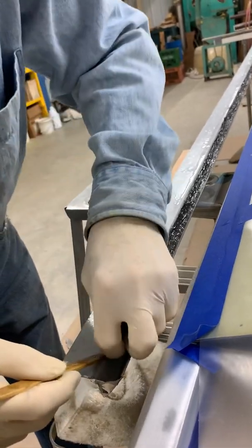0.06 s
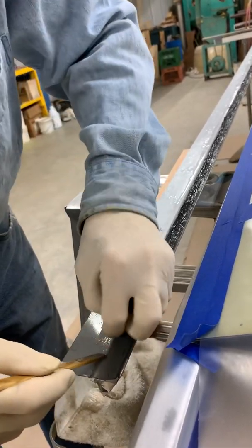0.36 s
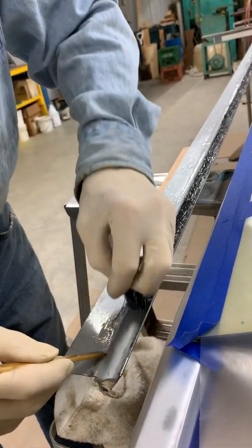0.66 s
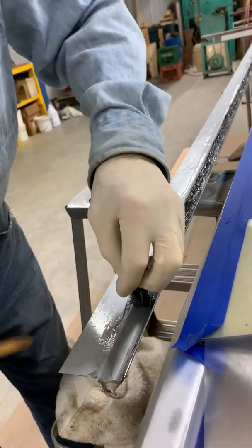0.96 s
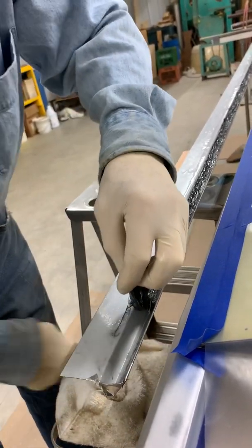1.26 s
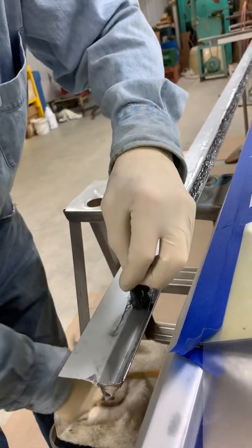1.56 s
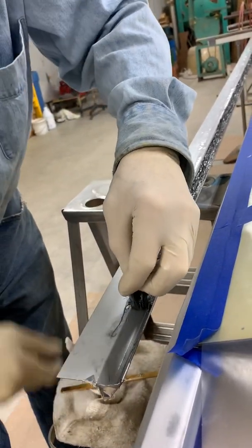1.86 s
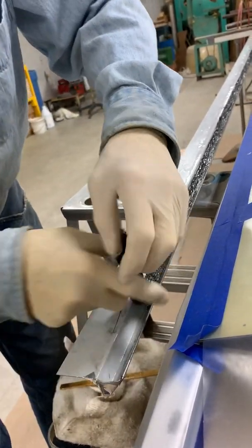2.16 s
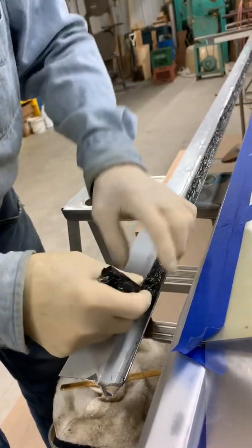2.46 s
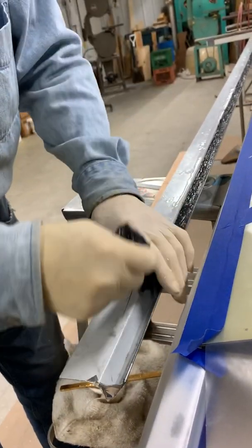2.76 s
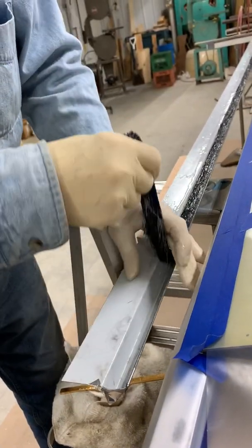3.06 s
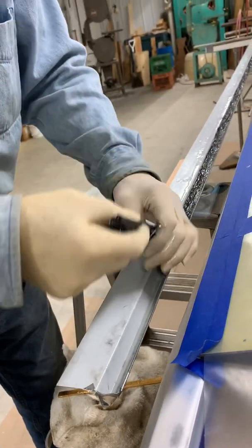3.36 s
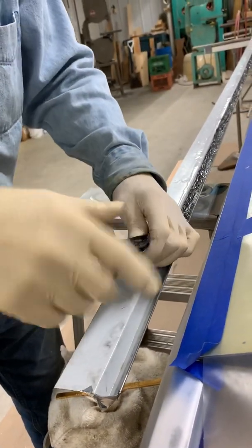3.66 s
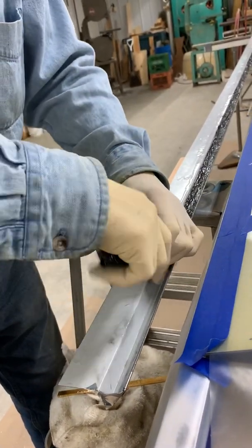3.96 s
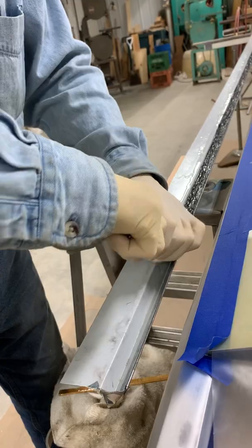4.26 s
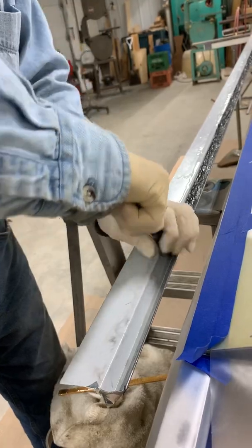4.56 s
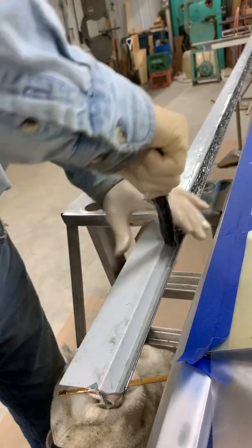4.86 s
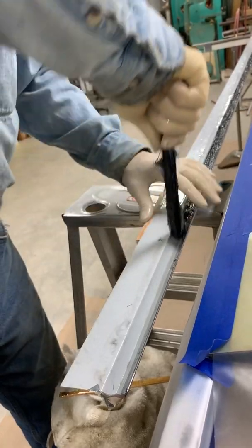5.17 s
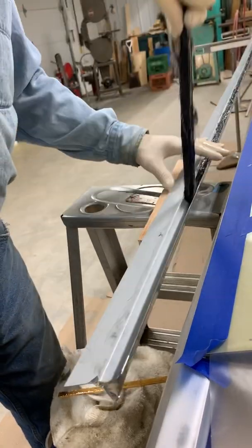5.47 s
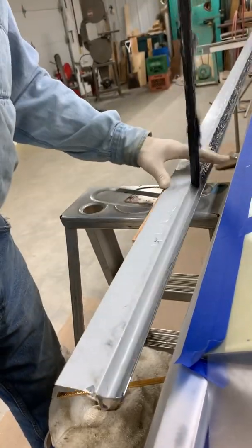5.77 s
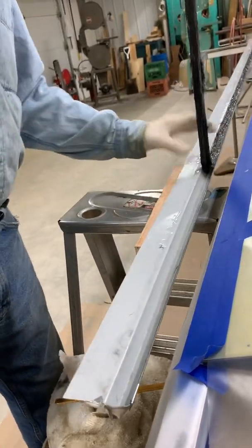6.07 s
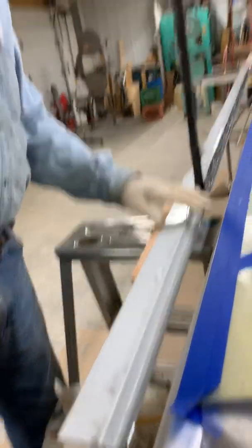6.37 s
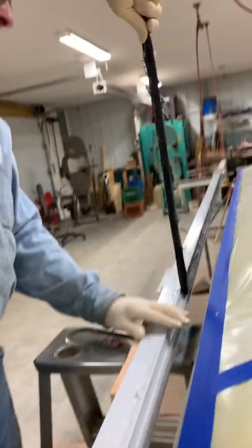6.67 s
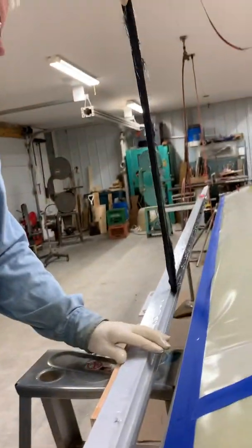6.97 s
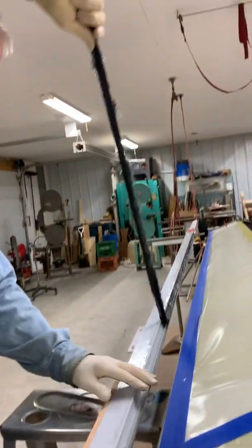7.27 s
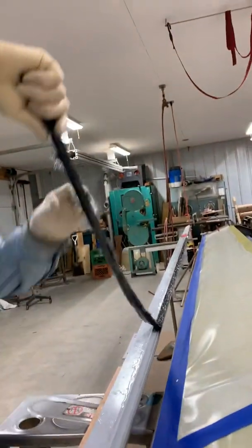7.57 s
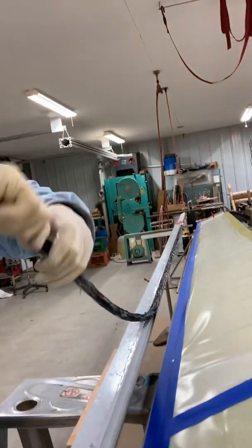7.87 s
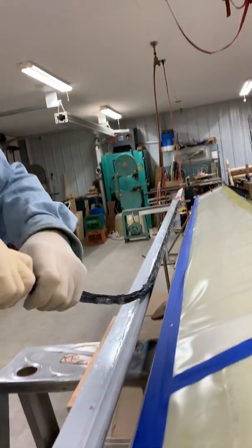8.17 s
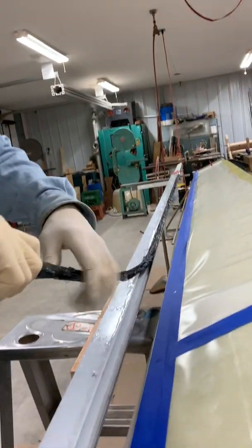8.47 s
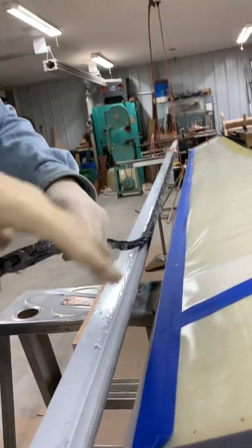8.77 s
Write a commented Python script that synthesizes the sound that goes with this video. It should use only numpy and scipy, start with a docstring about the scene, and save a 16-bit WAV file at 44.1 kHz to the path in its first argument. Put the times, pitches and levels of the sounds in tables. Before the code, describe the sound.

Sticky resin-soaked fibre crackles and snaps as gloved hands peel it from an aluminium trough, which knocks and rings in a workshop.

```python
"""Peeling carbon fibre from a trough

A workshop, close up, on a hand-held stereo microphone. Gloved hands peel a resin-soaked bundle of carbon
fibre out of a long aluminium trough, a little to the right. Tacky resin threads crackle and snap, sleeves
and gloves rustle, and the trough, lifted by the sticking fibre, drops back on its stand, knocks and rings.
The shop rumbles low underneath."""
import sys
import numpy as np
from scipy import signal
from scipy.fft import rfft, irfft, next_fast_len
from scipy.io import wavfile
from scipy.ndimage import map_coordinates

SR = 44100
rng = np.random.default_rng(int(sys.argv[2]) if len(sys.argv) > 2 else 0)


def store_wav(level_fs):
    """Save 16-bit WAV to argv[1]."""
    pcm = np.round(np.clip(np.atleast_2d(level_fs), -1, 1) * 32767)
    wavfile.write(sys.argv[1], SR, pcm.T.astype(np.int16))


N = 392931

# the trough landing on its stand: start_s, low_db, middle_db, high_db, click_db, clatter_t60_s
KNOCK_HITS = [(4.54, -65, -56, -75, -50, 0.018), (5.6811, -27, -20.5, -33.5, -29, 0.074),
              (5.7885, -37.5, -42.5, -40.5, -57, 0.041), (6.0212, -39, -46, -34.5, -36.5, 0.041),
              (6.185, -41, -37.5, -52, -55, 0.071), (6.3885, -45.5, -53.5, -50, -64, 0.045),
              (7.3308, -49.5, -47.5, -43.5, -59, 0.092), (7.357, -49.5, -53.5, -55, -75, 0.1)]
# modes of the aluminium trough: pitch_hz, level_db, t60_s
TROUGH_MODES = [(313, 1, .32), (378, -7, .28), (500, -9, .35), (641, 3.5, .66), (653, -4, .3),
                (705, -7, .4), (790, -5, .25), (753, -3, .28), (963, -4, .38), (1086, -8, .25),
                (1154, -5, .25), (1310, -7, .42), (1385, -8, .4), (1480, -5, .3), (1673, -3, .2),
                (1721, -2, .25), (1795, -2, .25), (1830, -5, .3), (1906, 0, .25), (1924, -1, .3),
                (2011, -3, .22), (2057, -3, .22), (2105, -4, .38), (2190, -1, .32), (2240, -3, .22),
                (2362, -4, .22), (2492, -3, .22), (2760, -3, .22), (2900, 2, .2), (2930, 1, .2),
                (3004, -3, .22), (3950, -7, .2)]


def from_db(db):
    """Decibels to gain."""
    return 10 ** (np.asarray(db) / 20)


def rms_one(x):
    """Scale to unit rms."""
    return x / np.sqrt(np.mean(x ** 2) + 1e-20)


def in_time(rows):
    """Read rows of time_s, value at every sample."""
    return np.interp(np.arange(N) / SR, *np.transpose(rows))


def at_hz(points, hz):
    """Read rows of frequency_hz, value on a log-frequency axis."""
    points_hz, values = np.transpose(points)
    return np.interp(np.log(np.maximum(hz, 1)), np.log(points_hz), values)


def drift(per_s):
    """Random wandering with unit rms."""
    knots = rng.standard_normal(4096)
    return rms_one(np.interp(np.arange(N) / SR * per_s, np.arange(len(knots)), knots))


def dying(t60, size):
    """An envelope that falls 60 dB in t60 seconds."""
    return from_db(-60 * np.arange(size) / SR / t60)


def band(x, low_hz, high_hz):
    """Causal band-pass."""
    return signal.sosfilt(signal.butter(2, [low_hz, high_hz], "band", fs=SR, output="sos"), x)


def colour(x, spectrum, size=4096):
    """Minimum-phase filter with the shape of the given spectrum; white noise keeps its power."""
    gain = from_db(at_hz(spectrum, np.arange(size // 2 + 1) * SR / size))
    cepstrum = irfft(np.log(gain))
    cepstrum[1:size // 2] *= 2
    cepstrum[size // 2 + 1:] = 0
    response = irfft(np.exp(rfft(cepstrum)))
    return signal.oaconvolve(x, response / np.linalg.norm(response))[:len(x)]


def resonate(x, hz, width_hz):
    """A two-pole resonance with unit gain at its peak."""
    r = np.exp(-np.pi * width_hz / SR)
    feedback = [1, -2 * r * np.cos(2 * np.pi * hz / SR), r * r]
    return signal.lfilter((1 - r * r) / 2 * np.array([1, 0, -1]), feedback, x)


def add(track, start_s, sound):
    """Mix a sound into a track."""
    start = int(start_s * SR)
    track[start:start + len(sound)] += sound[:N - start]


def gestures(rows, attack_s, release_s, idle_db):
    """Gain of overlapping movements: each swells, holds and dies away; their powers add."""
    t, power = np.arange(N) / SR, from_db(idle_db) ** 2
    for start_s, length_s, level_db in rows:
        swell = np.clip((t - start_s) / attack_s, 0, 1)
        fade = np.exp(-np.clip((t - start_s - length_s) / release_s, 0, 20))
        power = power + (from_db(level_db) * swell * fade) ** 2
    return np.sqrt(power)


def friction(rows, width_ratio, grain_db=3.5):
    """Each short slide swells and fades in a noise band of its own, in uneven slips."""
    out = np.zeros(N)
    for start_s, length_s, level_db, hz in rows:
        size = int(length_s * SR)
        slide = rms_one(band(rng.standard_normal(size), hz / width_ratio, hz * width_ratio))
        add(out, start_s, from_db(level_db) * slide * np.sin(np.linspace(0, np.pi, size)))
    return out * rms_one(from_db(grain_db * drift(110)))


def shop_air(rumble_db=-1.0, swell_db=1.5, hiss_db=-82.5):
    """Room tone: a low rumble, swelling at random, under a faint steady hiss, wide in the treble."""
    # slow course of the rumble: time_s, level_db
    rumble_levels = [(0.0, -55), (1.8, -61.5), (3.3, -56.5), (4.4, -56.5), (5.7, -52.5), (6.6, -55.5),
                     (7.7, -54.5), (8.9, -53)]
    # spectra of the rumble and the hiss: frequency_hz, level_db
    rumble_spectrum = [(12, -17.5), (25, -7.5), (45, 8.5), (80, -1), (150, -15), (300, -35.5), (600, -49.5),
                       (2000, -65)]
    hiss_spectrum = [(300, -7), (600, -9), (800, 6.5), (1050, -4.5), (1900, 0.5), (4000, -11.5),
                     (8000, -10.5), (15000, -9.5)]
    swell = from_db(in_time(rumble_levels) + rumble_db + swell_db * drift(9))
    rumble = swell * colour(rng.standard_normal(N), rumble_spectrum)
    side = band(colour(rng.standard_normal(N), hiss_spectrum), 1500, 19000) * np.array([[1], [-1]])
    mid = colour(rng.standard_normal(N), hiss_spectrum)
    return rumble + from_db(hiss_db) * (mid + 0.88 * side)


def workshop_echo(x, build_s=0.0012):
    """Diffuse echoes build up and die, the treble first; both microphone ports hear the bass alike."""
    # reverberation of the workshop: frequency_hz, t60_s
    decay_times = [(200, 0.89), (530, 1), (1400, 0.9), (3700, 0.21), (9700, 0.45), (16000, 0.27)]
    mid, side = rng.standard_normal((2, SR))
    noise = mid + .65 * band(side, 500, 19000) * np.array([[1], [-1]])
    edges_hz, response = np.geomspace(80, 19000, num=10), 0
    for k, (low, high) in enumerate(zip(edges_hz, edges_hz[1:])):
        t60 = at_hz(decay_times, np.sqrt(low * high))
        response = response + (-1) ** k * band(noise, low, high) * dying(t60, SR)
    response *= 1 - np.exp(-np.arange(SR) / SR / build_s)
    return signal.oaconvolve(x[None], response / np.linalg.norm(response[0]), axes=1)[:, :N]


def handling_flutter(gain_db=-4.5, swing_db=2.2):
    """Moving cloth and the hand-held microphone make a low, unsteady flutter."""
    # course of the handling noise: time_s, level_db
    flutter_levels = [(0.0, -56), (0.5, -70.5), (1.45, -64), (2.3, -68), (3.4, -57.5), (4.25, -65),
                      (4.6, -61.5), (5.9, -52.5), (7.14, -61.5), (7.8, -57), (8.2, -60), (8.9, -58)]
    # its spectrum: frequency_hz, level_db
    flutter_spectrum = [(40, -4.5), (80, 2), (150, 1.5), (250, -4.5), (400, -16), (700, -26.5), (2000, -45)]
    flutter = colour(rng.standard_normal(N), flutter_spectrum)
    return flutter * from_db(in_time(flutter_levels) + gain_db + swing_db * drift(11))


def scrapes():
    """A stick and the gloves scrape on the trough and along the bundle, each time in a narrow band."""
    # scraping movements: start_s, length_s, level_db, centre_hz
    slides = [(0.42, 0.18, -72.5, 2700), (0.56, 0.29, -73, 2900), (1.16, 0.08, -72, 1450),
              (1.79, 0.13, -78, 1650), (3.5, 0.45, -79, 1900), (7.26, 0.06, -76, 2900),
              (7.7, 0.62, -77, 1850), (8.28, 0.24, -75, 2800), (8.6, 0.12, -74, 1400)]
    return friction(slides, width_ratio=1.17)


def sleeve_flaps(gain_db=-5.0):
    """Folds of the denim sleeves flap dully."""
    # moving folds: start_s, length_s, level_db, centre_hz
    folds = [(0.08, 0.1, -63, 473), (0.99, 0.069, -72, 447), (1.32, 0.14, -67, 420), (1.5, 0.097, -88, 400),
             (2.06, 0.1, -68, 596), (3.36, 0.19, -77, 470), (3.62, 0.27, -83, 420),
             (4.53, 0.059, -57.5, 296), (4.75, 0.14, -66, 480), (4.97, 0.13, -66, 650),
             (7.62, 0.19, -64.5, 390), (7.8, 0.25, -71, 480), (8.18, 0.13, -70.5, 402),
             (8.34, 0.12, -77, 450), (8.78, 0.25, -77.5, 422)]
    return from_db(gain_db) * friction(folds, width_ratio=1.46)


def rustle(rub_db=-1.5, hollow_db=-3.5, grain_db=2.5, slip_db=3.0):
    """Denim and glove rubber rub and swish in uneven little slips, sounding hollow inside the trough."""
    # strokes of sleeves and gloves: start_s, length_s, rub_level_db, swish_offset_db, hollow_offset_db
    strokes = [(-0.04, 0.27, -70.5, 8, 9), (0.262, 0.15, -84.5, 14, 11), (0.44, 0.09, -74, 0, 7.5),
               (0.56, .22, -97, 10, -4), (0.9, 0.029, -83.5, 17, -2), (1.148, 0.023, -73.5, 15, 17.5),
               (1.27, 0.21, -63, -5.5, -4), (1.45, 0.19, -71.5, -11, -6), (1.78, 0.07, -73.5, -18, -18),
               (2.049, 0.033, -64.5, 4.5, -14), (2.68, 0.22, -72.5, -11, 3), (2.84, 0.568, -73, 1, 9),
               (3.19, 0.098, -68, 1, 8), (3.358, 0.45, -79.5, 7.5, 11.5), (4.17, 0.17, -78.5, 0, -17),
               (4.552, 0.15, -67.5, -20, 1.5), (4.758, 0.066, -62.5, -27, -2.5),
               (5.218, 0.84, -63, -9, 0.5), (5.529, 0.3, -53.5, -16.5, -9), (6.178, 0.027, -60.5, 8.5, 17),
               (6.63, 0.36, -65.5, 5, 5.5), (7.41, 0.13, -58.5, -5, -7), (7.54, 0.24, -64.5, -2.5, 0.5),
               (7.76, 0.38, -80, 2.5, 2.5), (8.26, 0.063, -76.5, 11.5, 2), (8.59, 0.087, -75.5, 14.5, 7)]
    # spectra of rubbing cloth and of a sliding sleeve: frequency_hz, level_db
    rub_spectrum = [(150, -8), (400, -3), (600, -10), (1200, -7.5), (2000, -7), (3500, -9), (5000, -14),
                    (15000, -32.5)]
    swish_spectrum = [(2500, -25), (4000, -20.5), (4900, 10.5), (6500, 10.5), (7600, -5.5), (9000, -3),
                      (11000, -3.5), (15000, -6)]
    # resonances around a glove in the trough: centre_hz, width_hz, level_db
    cavity_modes = [(805, 70, -3), (1710, 110, 0.5), (2020, 140, 5), (2940, 220, 2.5), (3790, 180, -1.5),
                    (4140, 420, 1.5)]
    start_s, length_s, level_db, swish_offset_db, hollow_offset_db = np.transpose(strokes)

    def stroke_gain(offset_db, idle_db):
        rows = zip(start_s, length_s, level_db + offset_db)
        return gestures(rows, attack_s=0.067, release_s=0.031, idle_db=idle_db)

    slips = rms_one(rng.standard_normal(N) * from_db(grain_db * drift(300) + slip_db * drift(35)))
    rub = from_db(rub_db) * colour(slips, rub_spectrum) * stroke_gain(0, idle_db=-82)
    swish = colour(slips, swish_spectrum) * stroke_gain(swish_offset_db, idle_db=-84)
    cavity = rms_one(sum(from_db(db) * resonate(slips, hz, width) for hz, width, db in cavity_modes))
    read_position = np.cumsum(1 + .04 * drift(12))   # the cavity changes as the hand moves
    hollow = from_db(hollow_db) * map_coordinates(cavity, [read_position], order=1, mode="mirror")
    return rub + swish + hollow * stroke_gain(hollow_offset_db, idle_db=-82)


def trough_taps(width_ratio=1.37, ring_db=-11, ring_t60_s=.09, size=8192):
    """A touch on the hand-damped trough wakes a narrow group of modes; the nearest one rings briefly."""
    # light taps of stick and fingers: start_s, level_db, centre_hz, t60_s
    touches = [(0.119, -52, 2230, 0.0064), (0.682, -66.5, 600, 0.11), (0.684, -66.5, 1570, 0.021),
               (1.081, -61, 1100, 0.025), (1.169, -65.5, 2230, 0.14), (1.286, -63.5, 347, 0.17),
               (1.412, -55, 2700, 0.061), (2.12, -75.5, 930, 0.88), (2.65, -69.5, 1810, 0.099),
               (3.004, -60.5, 1760, 0.031), (3.133, -58, 2520, 0.014), (4.21, -71, 1880, 0.06),
               (4.349, -71, 2500, 0.017), (4.376, -75, 2170, 0.021), (4.48, -68.5, 2600, 0.021),
               (4.541, -54, 2180, 0.027), (4.543, -62, 4000, 0.02), (4.79, -71.5, 1095, 0.058),
               (4.841, -53.5, 2888, 0.058), (4.909, -57.5, 2540, 0.085), (4.994, -68.5, 1030, 0.34),
               (6.462, -63.5, 2800, 0.017), (6.487, -67, 2900, 0.022), (6.646, -49, 2760, 0.077),
               (6.992, -43, 3330, 0.013), (7.739, -62, 2270, 0.032), (7.997, -75, 3050, 0.015),
               (8.628, -61.5, 1840, 0.062)]
    out, t = np.zeros(N), np.arange(size) / SR
    modes_hz = np.array(TROUGH_MODES)[:, 0]
    for start_s, level_db, hz, t60 in touches:
        tap = band(rng.standard_normal(size) * dying(t60, size), hz / width_ratio, hz * width_ratio)
        nearest_hz = modes_hz[np.argmin(abs(modes_hz - hz))]
        ring = from_db(ring_db) * np.sin(2 * np.pi * nearest_hz * t) * dying(ring_t60_s, size)
        add(out, start_s, from_db(level_db) * (tap / np.std(tap[:600]) + ring))
    return out


def trough_ringing(gain_db=-11.5, scatter_db=1.5):
    """The trough's least damped modes ring on after each knock, in a slightly different mix each time."""
    out, t = np.zeros(N), np.arange(SR) / SR
    band_centres_hz = [550, 1600, 3200, 7000]
    for start_s, *levels_db, _ in KNOCK_HITS:
        knock_spectrum = list(zip(band_centres_hz, levels_db))
        for hz, mode_db, t60 in TROUGH_MODES:
            level_db = at_hz(knock_spectrum, hz) + mode_db + gain_db + scatter_db * rng.standard_normal()
            ring = rng.choice([-1, 1]) * np.sin(2 * np.pi * hz * t) * dying(t60, SR)
            add(out, start_s, from_db(level_db) * ring)
    return out


def trough_knocks(clatter_db=-2.5, lead_in_s=0.0062, lead_in_db=-18):
    """A faint, brief mid-range noise comes just before each knock, then a short clatter of crowded modes."""
    # spectrum of the clatter: frequency_hz, level_db
    clatter_spectrum = [(70, -7), (150, 1), (240, -8), (315, -2.5), (450, -12), (660, -4.5), (1050, -9),
                        (1350, -12.5), (1850, -3.5), (2550, -7), (2900, -8.5), (4000, -16.5), (7000, -22),
                        (11000, -30), (15000, -47)]
    # only a heavy knock shakes the stand and reaches the bass: knock_low_db, lowest_hz
    bass_reach = [(-41, 380), (-36, 170), (-25, 23)]
    out, t = np.zeros(N), np.arange(SR) / SR
    for start_s, *levels_db, t60 in KNOCK_HITS:
        lowest_hz = np.interp(levels_db[0], *np.transpose(bass_reach))
        edges_hz = [lowest_hz, 1000, 2300, 4500, 17000]
        contact = 1 - np.exp(-t / (0.015 * t60))   # a longer clatter also starts more softly
        for low, high, level_db in zip(edges_hz, edges_hz[1:], levels_db):
            burst = rng.standard_normal(SR) * contact * dying(t60, SR)
            clatter = band(colour(burst, clatter_spectrum), low, high)
            add(out, start_s, from_db(level_db + clatter_db) * clatter / np.std(clatter[:600]))
        lead_in = rms_one(band(rng.standard_normal(int(lead_in_s * SR)), 1400, 3000))
        add(out, start_s - lead_in_s, from_db(levels_db[1] + lead_in_db) * lead_in)
    return out


def resin_snaps(skirt_db=6.5, shiver_t60_s=.004, size=1024):
    """A thick thread parts with one sharp impulse and a weak shiver, too small to radiate any bass."""
    # threads of resin and glove rubber snapping: start_s, level_db, centre_hz
    threads = [(0.119, -50, 4000), (0.312, -49, 9200), (0.3298, -58, 6800), (0.3337, -50, 12500),
               (0.368, -52.5, 9500), (0.3816, -56, 6400), (0.4173, -53, 14900), (0.4299, -63, 13300),
               (0.4418, -62, 8200), (0.4692, -48.5, 3800), (0.5061, -46.5, 6600), (0.5189, -52, 5700),
               (0.532, -53, 9200), (0.5568, -64, 6800), (0.5795, -61, 17000), (0.6173, -57, 15000),
               (0.6356, -56, 17000), (0.672, -52, 17000), (0.6845, -41, 10000), (0.7454, -47.5, 17400),
               (0.7737, -58, 17000), (0.804, -54.5, 11400), (1.1694, -49.5, 9400), (1.4137, -47.5, 4270),
               (1.54, -54.5, 6800), (2.229, -66, 8200), (2.2317, -52.5, 10700), (2.7709, -59, 7000),
               (2.7786, -53, 9200), (2.8123, -60, 11800), (2.8564, -45.5, 4400), (2.885, -52, 9200),
               (2.907, -58, 8900), (2.9241, -37, 14200), (2.9382, -46.5, 5960), (2.9502, -40.0, 12500),
               (2.998, -50, 9700), (3.0055, -46, 8200), (3.0089, -45, 9200), (3.0442, -54, 6400),
               (3.0814, -50, 10700), (3.0963, -46.5, 5130), (3.117, -53, 9000), (3.1324, -35.5, 6200),
               (3.1347, -45, 7800), (3.1706, -46.5, 7900), (3.2054, -39, 7000), (3.3336, -47.5, 6200),
               (3.3587, -51.5, 8200), (3.414, -59.5, 5160), (3.6169, -54, 5760), (4.092, -62, 14300),
               (4.1908, -52, 16500), (4.1959, -60, 9200), (4.2128, -51.5, 12200), (4.2153, -57.5, 6800),
               (4.3596, -58, 14200), (4.3783, -62, 8200), (4.4804, -57.5, 4670), (4.601, -52.5, 3700),
               (4.6313, -53.5, 9030), (4.9838, -56, 8970), (5.1393, -61, 10350), (5.1888, -49.0, 12320),
               (5.1993, -54.5, 12570), (5.2215, -55, 9720), (5.2331, -57, 6200), (5.2514, -53, 8220),
               (5.2685, -47.0, 5500), (5.2905, -32.5, 9500), (5.2972, -25, 9500), (5.41, -46.0, 6000),
               (5.4277, -37.5, 7000), (5.442, -41, 8170), (5.4648, -44, 7700), (5.482, -46.5, 11800),
               (5.5083, -48, 10700), (5.516, -53, 8200), (5.5367, -46, 5320), (5.5406, -49, 11110),
               (5.5867, -42, 9500), (5.6367, -42, 10400), (5.6736, -37.5, 11450), (5.8178, -36.5, 12900),
               (5.889, -45.5, 7200), (5.9304, -44.5, 10100), (5.9438, -48, 10700), (5.963, -49, 9500),
               (5.971, -54, 10100), (5.9961, -46.5, 9200), (6.008, -48, 9800), (6.133, -52.5, 6800),
               (6.5936, -53.5, 11100), (6.647, -38.5, 12500), (6.6485, -39, 6200), (6.686, -46, 11100),
               (6.7023, -45, 14200), (6.7301, -36, 11500), (6.747, -38.5, 16900), (6.76, -49, 7150),
               (6.7676, -30.5, 14400), (6.7842, -39, 11100), (6.7878, -46, 9460), (6.8125, -44, 7400),
               (6.8372, -40, 15600), (6.8424, -49, 13300), (6.922, -49, 12500), (6.9361, -52, 9800),
               (6.9436, -40.5, 9000), (6.9612, -48, 15000), (6.969, -44, 12100), (6.9928, -38, 4600),
               (7.0058, -43, 8730), (7.0346, -41.5, 12900), (7.045, -40, 10700), (7.0898, -51.5, 9200),
               (7.1035, -52, 11000), (7.1128, -58, 7700), (7.191, -54.5, 6000), (7.585, -56, 16000),
               (7.9984, -56.5, 7040), (8.6276, -48, 7200)]
    out, edges_hz = np.zeros(N), [2000, 4500, 10000, 17000]
    bass_cut = signal.butter(2, 1400, "high", fs=SR, output="sos")
    for start_s, level_db, hz in threads:
        shiver = .22 * rng.standard_normal(size) * dying(shiver_t60_s, size)
        burst = signal.sosfilt(bass_cut, signal.unit_impulse(size) + shiver)
        for k, (low, high) in enumerate(zip(edges_hz, edges_hz[1:])):
            crack = (-1) ** k * band(burst, low, high)
            octaves_away = np.log2(np.sqrt(low * high) / hz)
            gain = from_db(level_db - skirt_db * octaves_away ** 2)
            add(out, start_s, gain * crack / np.std(crack[:88]))   # the first 2 ms set the level
    return out


def resin_crackle(breaks_per_s=220, firm_pull_db=-55, clump_db=4.5, size_spread_db=3.5, colour_db=2.0):
    """Tiny resin threads break in clumps, more of them the harder the pull, a few louder than the rest."""
    # pulls that part the sticky fibre from trough or glove: start_s, length_s, level_db
    pulls = [(0.3, 0.16, -72), (0.485, 0.072, -66), (0.57, 0.07, -67), (0.65, 0.17, -70.5),
             (1.36, 0.095, -65.5), (2.2, 0.054, -61.5), (2.63, 0.1, -77), (2.76, 0.15, -62.5),
             (2.84, 0.32, -59.5), (3.32, 0.053, -58.5), (4.17, 0.065, -66.5), (4.335, 0.034, -63),
             (5.19, 0.17, -58.5), (5.28, 0.25, -56.5), (5.56, 0.21, -55.5), (5.78, 0.24, -53.5),
             (6.57, 0.085, -59.5), (6.64, 0.2, -52), (6.73, 0.2, -54.5), (6.92, 0.14, -47.5),
             (7.04, 0.087, -57.5), (7.11, 0.047, -62), (7.47, 0.15, -68), (8.6, 0.091, -61.5)]
    # spectrum of the tacky resin: frequency_hz, level_db
    tack_spectrum = [(1000, -21.5), (1600, -22.5), (2300, 4), (2950, 2.5), (3450, -1.5), (3850, -7),
                     (4300, -3.5), (5400, 1.5), (7500, -2), (9500, 1.5), (13500, 6.5), (16000, 1)]
    peel = gestures(pulls, attack_s=0.041, release_s=0.0065, idle_db=-84.5)
    rate = breaks_per_s * (peel / from_db(firm_pull_db)) ** 0.29
    clumps = drift(45)
    breaks = np.flatnonzero(rng.random(N) < rate * from_db(clump_db * clumps) / SR)
    size_db = size_spread_db * np.minimum(rng.exponential(1, N), 2.8)
    sizes = rms_one(from_db(size_db) * rng.choice([-1, 1], N))[breaks]
    sizes *= np.sqrt(SR / rate[breaks])   # a faster rate alone adds no power
    edges_hz, crackle = np.geomspace(1200, 19000, num=8), 0
    for k, (low, high) in enumerate(zip(edges_hz, edges_hz[1:])):
        tint = rms_one(from_db(colour_db * rng.standard_normal(N)))   # each break has its own colour
        clicks = np.zeros(N)
        clicks[breaks] = sizes * tint[breaks]
        crackle = crackle + (-1) ** k * band(clicks + 1e-18, low, high)
    # threads too fine to tell apart
    fizz = from_db(-2.0 + 2.6 * clumps) * band(rng.standard_normal(N), edges_hz[0], edges_hz[-1])
    return colour((crackle + fizz) * peel, tack_spectrum)


def scene(knock_room_db=-8.5, tap_room_db=-11.5, cloth_room_db=-8.0, resin_room_db=-13.5):
    """The resin is close and dry, its echo dull; the trough lies a little right and fills the room."""
    resin = resin_crackle() + resin_snaps()
    knocks, taps = trough_knocks(), trough_taps()
    cloth = rustle() + handling_flutter() + sleeve_flaps() + scrapes()
    to_the_right = from_db([[-.8], [.8]])
    trough = (knocks + taps + trough_ringing()) * to_the_right
    dull_resin = signal.lfilter(*signal.butter(1, 7000, fs=SR), resin)
    into_room = (from_db(resin_room_db) * dull_resin + from_db(knock_room_db) * knocks
                 + from_db(tap_room_db) * taps + from_db(cloth_room_db) * cloth)
    return resin + trough + cloth + workshop_echo(into_room) + shop_air()


def record(dry, cutoff_hz=16400):
    """A microphone with two close ports: the right hears the treble slightly later; the top is cut."""
    # phase between the ports: frequency_hz, left_lead_rad
    port_phase = [(0, 0), (250, -.15), (700, -.65), (1200, -.5), (1800, .1), (2600, .8), (3900, 1.6),
                  (4700, 3.1), (6400, 5.7), (7500, 6.8), (8900, 9.4), (10500, 12.0), (11600, 13.1),
                  (13100, 15.7), (14700, 18.3), (17000, 20.5)]
    size = next_fast_len(N + 4096)
    hz = np.arange(size // 2 + 1) * SR / size
    lag_rad = np.interp(hz, *np.transpose(port_phase))
    right = irfft(rfft(dry[1], size) * np.exp(-1j * lag_rad), size)[:N]
    top_cut = signal.firwin(161, cutoff_hz, window=("kaiser", 7), fs=SR)
    return signal.oaconvolve(np.array([dry[0], right]), top_cut[None], "same", axes=1)


dry = scene()
out = record(dry)
store_wav(out)
```